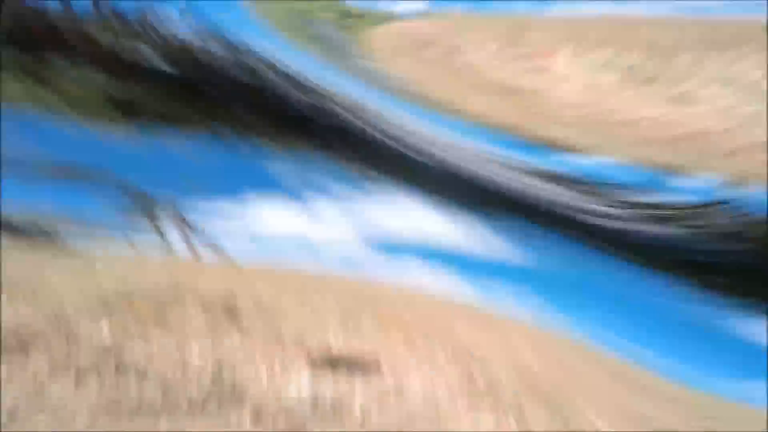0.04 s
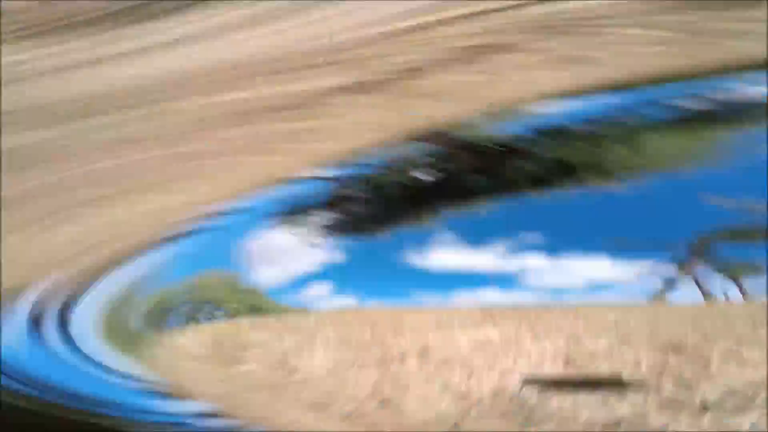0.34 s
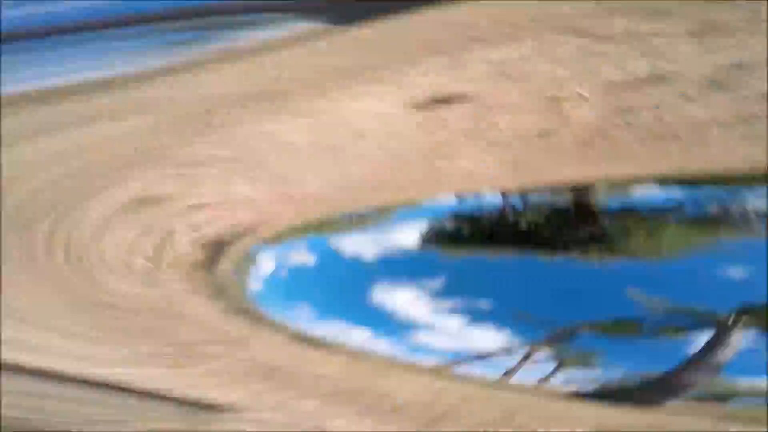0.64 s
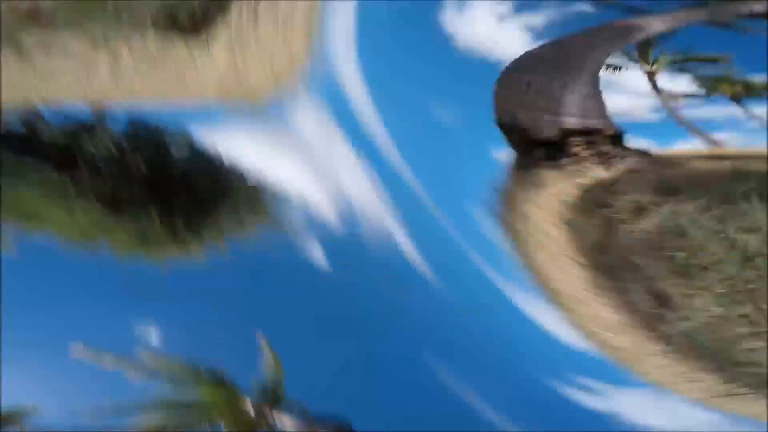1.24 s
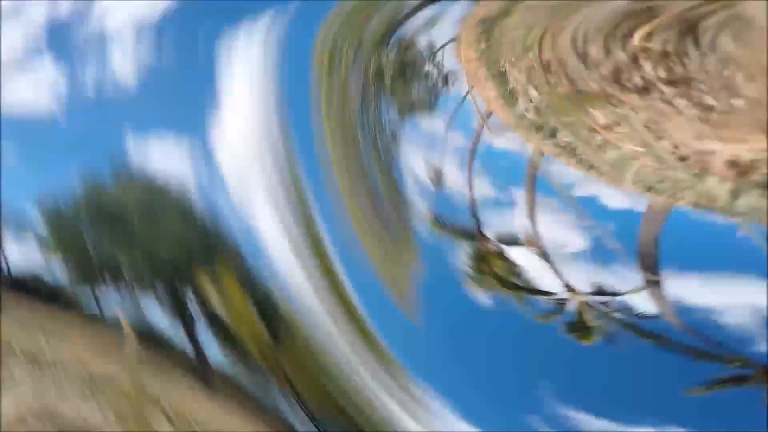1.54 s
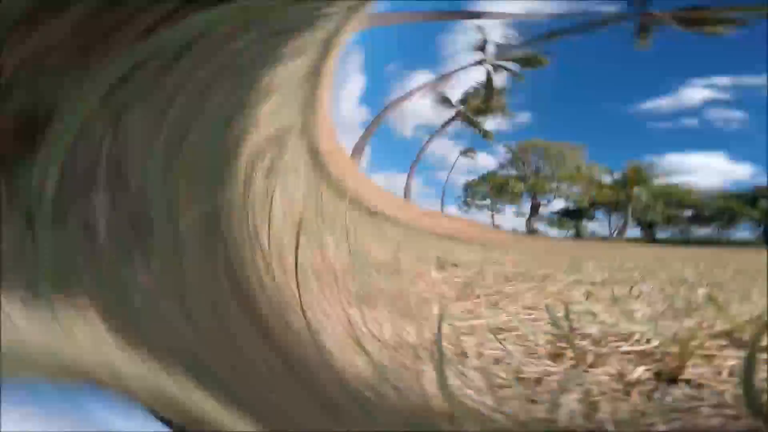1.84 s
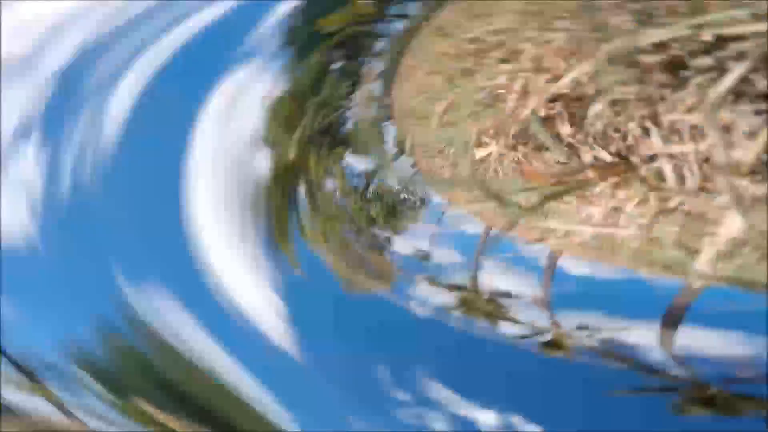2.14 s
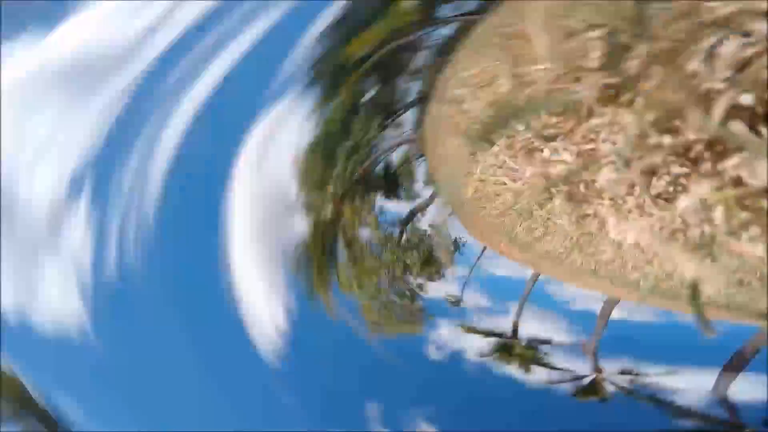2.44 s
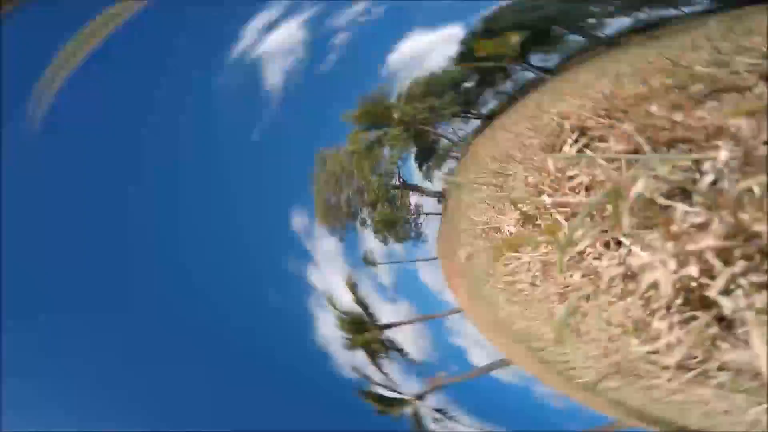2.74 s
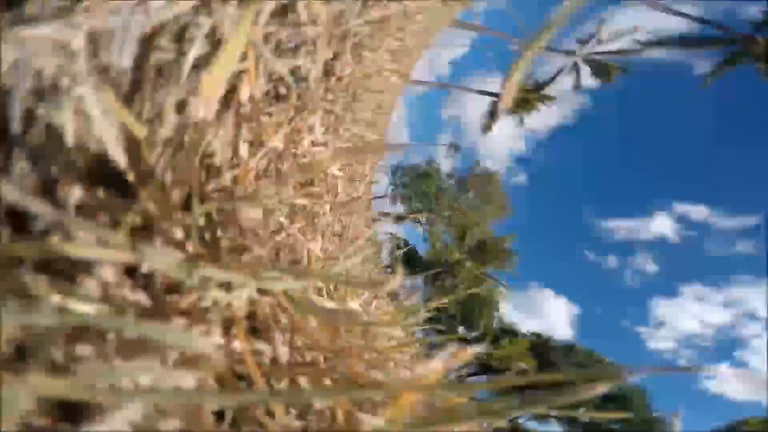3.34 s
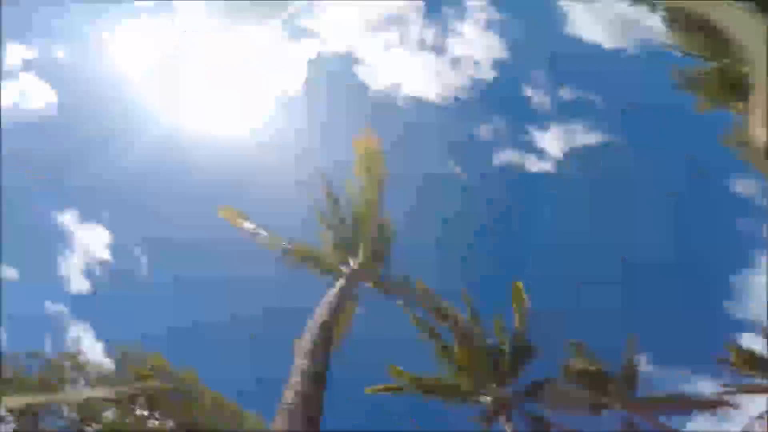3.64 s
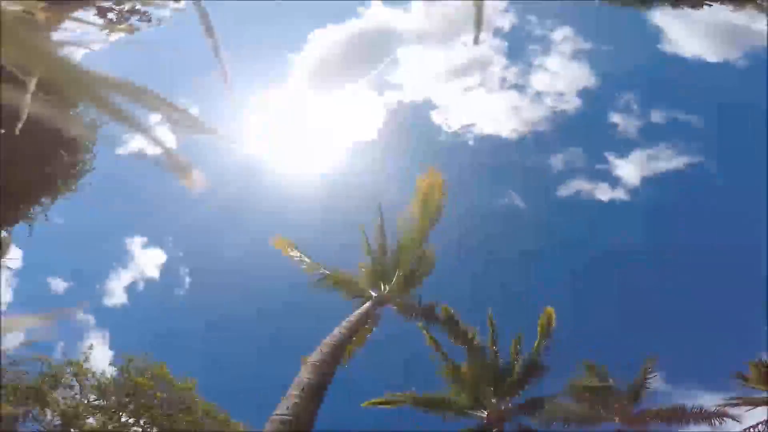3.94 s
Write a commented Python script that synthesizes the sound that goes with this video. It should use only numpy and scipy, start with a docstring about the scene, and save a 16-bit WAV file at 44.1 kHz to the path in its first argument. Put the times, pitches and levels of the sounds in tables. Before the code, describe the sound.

A small drone tumbles through dry grass, heard from its own microphone. Low wind buffets at first, then sharp crunches with snapping stems and dull thumps land at about 0.4 and 1 second. From 1.4 seconds the crunches come quickly while the wind dies down. After about 2.5 seconds they merge into a crackling, scraping slide that fades near 3.9 seconds, ending with a very faint, brief whine.

```python
"""Low, gusty wind buffets the microphone of a small drone that cartwheels over a dry lawn, motors stopped.
The turbulence dies down as the tumble slows. Each touch of the ground crushes a tuft of brittle stalks,
whose fractures crackle and excite the shell's resonances; thick stems snap and the frame thumps on the soil.
The touches merge into a last slide, and a faint whine follows. All is heard from the drone's own camera."""
import sys
import numpy as np
from scipy import signal
from scipy.fft import rfft, irfft, next_fast_len
from scipy.io import wavfile
from scipy.ndimage import uniform_filter1d

SR = 44100
rng = np.random.default_rng(int(sys.argv[2]) if len(sys.argv) > 2 else 0)


def int16_out(signal):
    """Quantize to a 16-bit WAV file."""
    q = np.round(np.clip(np.atleast_2d(signal).T, -1, 1) * 32767)
    wavfile.write(sys.argv[1], SR, q.astype(np.int16))


N = 176400

# Spectrum of dry straw: f/Hz, level/dB
STRAW_SPECTRUM = [(150, -9.5), (500, -12), (1000, -10), (2000, -14.5), (2900, 5.5), (4500, 0), (6300, 2.5),
                  (8500, -0.5), (11000, -2), (14500, -8), (16000, -35.5)]


def crushed_tufts():
    """Brittle fracture and friction radiate directly and through the shell; touches add in power."""
    # Touches: t/s, hold/s, rise/s, fall/s, level/dB, shell gain/dB, treble tilt/dB
    touches = [ (0.363, 0.02, .015, 0.032, -35, -6, 1), (0.391, 0.0021, 0.023, 0.037, -18.5, -1.5, 2.5),
               (0.979, 0.0063, 0.035, 0.048, -15.5, -10, 1.5), (1.383, 0.003, 0.011, 0.089, -16, -2.5, 1.5),
               (1.43, 0.018, 0.045, 0.032, -19, -6.5, -1), (1.636, 0.0025, 0.021, 0.023, -33.5, 14, 4),
               (1.65, 0.021, 0.021, 0.023, -27.5, -1.5, -2), (1.83, 0.045, 0.013, 0.053, -28, -2.5, 3),
               (1.916, 0.011, 0.027, 0.046, -39.5, -0.5, 3), (2.003, 0.015, 0.037, 0.064, -27, -1, 2),
               (2.05, 0.013, 0.035, 0.043, -33, 2, -3), (2.248, 0.032, 0.025, 0.027, -23, -5, -0.5),
               (2.304, 0.0087, 0.04, 0.052, -51, 6.5, 5), (2.461, 0.012, 0.0066, 0.079, -22, 0.5, 2),
               (2.539, 0.04, 0.0068, .07, -32.5, -5.5, 2), (2.67, 0.011, 0.022, 0.02, -20.5, -13.5, 2.5),
               (2.647, 0.15, .012, 0.2, -40, 0.5, 4), (2.767, 0.0057, 0.012, 0.044, -29, -28, -4),
               (2.897, 0.0041, 0.039, 0.094, -23, -3, 1.5), (3.011, 0.021, 0.0083, .08, -45, 4.5, 0),
               (3.093, 0.0091, 0.031, 0.1, -31, -7.5, -4.5), (3.192, 0.015, 0.017, 0.067, -44, -7, -3),
               (3.257, 0.06, 0.011, 0.097, -44, 5, -5), (3.303, 0.011, 0.028, 0.28, -36, -6, -2),
               (3.387, 0.0039, 0.042, 0.077, -25.5, -8, 0), (3.476, 0.067, 0.073, 0.038, -38, -0.5, 5.5),
               (3.515, 0.071, 0.035, 0.073, -35, 1, 1), (3.633, 0.065, 0.24, .06, -42, -14, 1),
               (3.766, 0.016, 0.18, 0.18, -29.5, -5.5, 0)]
    slope_db = 41.5  # change over one rise or fall time
    t, power = clock(), np.zeros((3, N))
    for start, hold, rise, fall, db, shell_db, tilt_db in touches:
        level = db - slope_db * (np.maximum(start - t, 0) / rise + np.maximum(t - start - hold, 0) / fall)
        active = level > -100
        power[:, active] += amp(level[active] + np.array([[-tilt_db], [tilt_db], [shell_db]])) ** 2
    fractures = crackle(per_s=2600, scatter_db=3.5)
    rubbing = 0.44 * rng.standard_normal(N)
    stalks = patchy(fractures + rubbing, depth_db=2.2, width_hz=200, span_s=0.008)
    straw = steadied(coloured(stalks, STRAW_SPECTRUM), span_s=0.0087)
    treble = filtered(straw, lambda hz: 1 - 1 / (1 + (hz / 5000) ** 4))
    shell = steadied(filtered(stalks, shell_response), span_s=0.036)
    return np.sum(np.sqrt(power) * [straw - treble, treble, shell], axis=0)


def crackle(per_s, scatter_db, candidates=16000, size=320):
    """Stalks break at random instants, each a damped oscillation of random pitch and strength."""
    median_hz, log_spread, decay_cycles = 4763, 0.577, 1.5
    draws, detune = rng.random((candidates, 4)), rng.standard_normal(candidates)
    breaks = draws[:, 0] < per_s * N / SR / candidates
    onset, weakness, phase = np.hsplit(draws[breaks, 1:], 3)
    hz = np.clip(median_hz * np.exp(log_spread * detune[breaks]), 500, 16000)[:, None]
    cycles = hz * np.arange(size) / SR
    strength = amp(-scatter_db * np.log(np.maximum(weakness, 0.02))) * np.sqrt(hz)
    envelope = strength * (1 - np.exp(-2 * cycles)) * np.exp(-cycles / decay_cycles)
    rings = envelope * np.sin(2 * np.pi * (cycles + phase))
    samples = (onset * N).astype(int) + np.arange(size)
    return unit(np.bincount(samples.ravel(), rings.ravel(), N + size)[:N])


def shell_response(f):
    """Modal superposition: the shell responds as a sum of damped resonators of alternating sign."""
    # Shell modes: f/Hz, bandwidth/Hz, level/dB
    modes = [(730, 980, -10), (1388, 260, 2.5), (1636, 310, -2), (2882, 554, 2.5)]
    return sum((-1) ** k * amp(db) * 1j * f * width / (centre ** 2 - f ** 2 + 1j * f * width)
               for k, (centre, width, db) in enumerate(modes))


def sharp_ticks(size=2048):
    """Impulsive excitation by wind, fracture or impact: a noise burst about one pitch, with a faint ring."""
    # Two faint wind ticks on the microphone, then stems snapping and straw striking the shell:
    # t/s, relative peak level/dB, f/Hz, T60/s
    ticks = [(.066, -31, 2600, 0.0063), (.2125, -49, 2180, 0.005), (0.3602, -16.5, 2600, 0.004),
             (.3660, -14.5, 5500, 0.0039), (0.388, -3.5, 5500, 0.0056), (0.3895, -11.5, 4500, .007),
             (.3940, 0.5, 2700, 0.0058), (0.4118, -25, 6700, 0.0087), (0.942, -6.5, 2900, 0.0066),
             (0.9664, -6.5, 5600, 0.0041), (0.977, -16.5, 3400, 0.0095), (0.9797, -2.5, 4260, 0.0061),
             (1.3862, -22, 6400, 0.0069), (1.42, -10, 2900, 0.0028), (1.423, -6.5, 5000, 0.0056),
             (1.5106, -29.5, 8000, 0.0037), (1.585, -29.5, 3150, 0.0042), (1.616, -21, 2800, .0055),
             (1.6325, -12, 2850, .008), (1.65, -2, 7000, 0.0051), (1.8270, -21.5, 6450, 0.0055),
             (1.9864, -14, 7700, 0.0046), (2.0173, -6, 6500, 0.0078), (2.0955, -19.5, 6600, 0.011),
             (2.199, -31.5, 6500, 0.027), (2.2458, -8, 4900, 0.0037), (2.2509, -2.5, 3200, 0.002),
             (2.2798, -9.5, 7300, 0.014), (2.3453, -33, 3100, 0.0089), (2.4365, -23.5, 4100, 0.017),
             (2.4615, -5.5, 3300, 0.026), (2.4744, -6.5, 2200, 0.014), (2.4827, -1, 7800, 0.0026),
             (2.5334, -14, 4900, .012), (2.6374, -16.5, 5200, 0.017), (2.6525, -13, 4360, .004),
             (2.6735, -8, 5200, 0.0045), (2.6744, 1.5, 5600, 0.0023), (2.696, -9, 6400, 0.0039),
             (2.755, -5.5, 3600, 0.0054), (2.798, -14.5, 5400, 0.017), (2.829, -17, 2750, 0.022),
             (2.573, -13.5, 6150, 0.0099), (2.594, -22, 4800, 0.0058), (2.8703, -6.5, 3200, 0.012),
             (2.8787, -11, 4500, 0.002), (2.8878, -1.5, 3400, 0.0013), (3.0724, -21, 3160, 0.016),
             (3.0877, -22.5, 4000, .004), (3.094, -17, 2900, 0.0064), (3.2244, -22.5, 6300, 0.0036),
             (3.377, -7, 3100, 0.0078), (3.4473, -18.5, 6400, 0.015), (3.520, -9, 2750, 0.016),
             (3.5435, -26, 4500, .004), (3.579, -20.5, 3020, 0.0044), (3.7021, -15.5, 3000, .004),
             (3.723, -10, 3400, 0.0041), (3.728, -10, 3600, 0.0022), (3.811, -16, 4420, 0.0035)]
    log_width, ring_db, ring_t60 = 0.29, -14, 0.022
    out, t = np.zeros(N + size), np.arange(size) / SR
    attack = 1 - np.exp(-t / 0.00005)
    for start, db, hz, t60 in ticks:
        band = lambda f: np.exp(-0.5 * (np.log((f + 1) / hz) / log_width) ** 2)
        skirt = lambda f: 0.33 * f / (f + 900) / (1 + (f / (2.5 * hz)) ** 3)
        grain = filtered(rng.standard_normal(size), lambda f: band(f) + skirt(f))
        decay = amp(-60 * t / t60) + amp(ring_db - 60 * t / ring_t60)
        burst = steadied(grain, span_s=0.0012) * decay * attack
        out[round(start * SR):][:size] += amp(db - 1.5) * burst / np.abs(burst).max()
    return out[:N]


def frame_thumps():
    """Inelastic impact: soft soil stops the frame with one low push and a dull puff."""
    # Impacts: t/s, level/dB, duration/s
    impacts = [(0.388, -13, 0.039), (0.983, -24.5, 0.043), (1.645, -28.5, 0.054), (2.039, -33.5, 0.051),
               (2.14, -32, 0.041), (2.26, -29.5, 0.087), (2.459, -28.5, 0.057), (2.618, -36.5, .12),
               (3.09, -69, 0.22), (3.307, -34, 0.057), (3.403, -41, 0.058), (3.586, -56, 0.11),
               (3.776, -39.5, 0.032)]
    # Spectrum of the puff of soil: f/Hz, level/dB
    soil_spectrum = [(20, -11), (60, 0), (120, 0), (220, -8.5), (400, -17.5), (800, -23.5), (2000, -43.5),
                     (8000, -86.5)]
    push_hz, puff_db = 56, -3.5
    t, push, puff = clock(), np.zeros(N), np.zeros(N)
    for start, db, duration in impacts:
        since = np.maximum(t - start, 0)
        age = 6 * since / duration  # the swell peaks at age 1
        swell = amp(db) * (age * np.exp(1 - age)) ** 2
        push += swell * np.sin(2 * np.pi * push_hz * since)
        puff += swell
    return push + amp(puff_db) * puff * steadied(noise(soil_spectrum), span_s=0.018)


def air_buffeting():
    """Turbulent pressure falls as the tumble slows; each swell of the rumble brings a rougher flutter."""
    # Strength of the air stream: t/s, relative level/dB
    stream = [(0.0, -20), (0.02, -20.5), (0.38, -21), (0.39, -23), (0.5, -30), (1.0, -21.5), (1.04, -35.5),
              (1.34, -28), (1.53, -37), (1.67, -35.5), (1.69, -36.5), (2.08, -36.5), (2.21, -42),
              (2.24, -34), (3.27, -55), (3.32, -40), (3.35, -53), (4.0, -64)]
    # Spectrum of the slow pressure swells: f/Hz, level/dB
    rumble_spectrum = [(12, -10.5), (28, 1), (55, 0), (80, -7.5), (120, -17), (200, -27.5), (400, -48),
                       (1000, -83)]
    # Spectrum of the flutter: f/Hz, level/dB
    flutter_spectrum = [(60, -19.5), (160, 2.5), (330, 1.5), (600, -10.5), (1200, -21), (2500, -33),
                        (5000, -46.5), (12000, -61)]
    # Eddies tearing at the microphone port: t/s, level/dB
    eddies = [(0.021, -34), (0.05, -35.5), (0.069, -39), (0.122, -37), (0.168, -37), (0.215, -29),
              (0.236, -31), (0.276, -38), (0.314, -35), (.603, -43), (0.782, -39.5), (0.836, -41),
              (0.877, -51), (1.106, -47.5), (1.283, -57.5)]
    gust_db, swing_db, flutter_growth, eddy_s = 2, 5, 1.102, 0.002
    t = clock()
    gusts = np.clip(noise([(5, -12.5), (12, 3), (25, -3), (60, -76), (200, -120)]), -2, 2)
    level = np.interp(t, *np.transpose(stream)) + gust_db * gusts
    rumble = steadied(noise(rumble_spectrum), span_s=0.015)
    flutter = patchy(noise(flutter_spectrum), depth_db=3, width_hz=230, span_s=0.0026)
    flutter = unit(flutter * amp(swing_db * np.clip(rumble, -2, 2)))
    flutter_db = level.mean() + flutter_growth * (level - level.mean()) - 19
    pulses = sum(amp(db) * np.exp(-0.5 * ((t - centre) / eddy_s) ** 2) for centre, db in eddies)
    tearing = noise([(150, -22), (500, 8), (1200, -4.5), (3000, -18), (6000, -39), (14000, -61)])
    return amp(level + 1) * rumble + amp(flutter_db) * flutter + pulses * tearing


def stray_blades():
    """Light friction: single blades of grass brush the shell with soft ticks between the touches."""
    # Strength of the brushing: t/s, level/dB
    brushing = [(1.44, -86.5), (1.48, -80), (1.54, -58), (1.7, -55.5), (1.73, -93), (1.81, -90),
                (1.9, -48.5), (2.13, -54.5), (2.18, -69), (2.22, -47.5), (2.32, -69), (2.37, -68.5),
                (2.45, -40), (3.85, -56), (3.95, -76.5)]
    cutoff_hz = 6000
    ticks = coloured(crackle(per_s=500, scatter_db=5), STRAW_SPECTRUM) + 0.15 * noise(STRAW_SPECTRUM)
    dulled = filtered(ticks, lambda hz: 1 / np.sqrt(1 + (hz / cutoff_hz) ** 2))
    return steadied(dulled, span_s=0.03) * amp(np.interp(clock(), *np.transpose(brushing)))


def whine():
    """Frequency modulation: a faint tone and its octave rise and fall once the drone lies still."""
    start_s, duration_s, level_db = 3.91, 0.086, -63
    base_hz, glide_hz, waver_hz = 364, 161, 10
    arch = np.sin(np.pi * np.clip((clock() - start_s) / duration_s, 0, 1))
    hz = base_hz + glide_hz * arch + waver_hz * noise([(100, 3.5), (400, -46.5)])
    phase = 2 * np.pi * np.cumsum(hz) / SR
    return amp(level_db) * arch * (np.sin(phase) + amp(-11.5) * np.sin(2 * phase))


def noise_floor():
    """Stationary noise, strongest in the bass, lies faintly under everything."""
    return amp(-71.5) * noise([(50, 4), (1000, -13), (4000, -23.5), (15000, -30)])


def amp(db):
    """Amplitude ratio of a level in decibels."""
    return 10 ** (np.asarray(db) / 20)


def unit(x):
    """Normalisation to rms 1."""
    return x / np.sqrt(np.mean(x ** 2) + 1e-20)


def clock():
    """Sampling instants, t/s."""
    return np.arange(N) / SR


def filtered(x, response):
    """Linear filtering: the spectrum of x times a frequency response."""
    size = next_fast_len(len(x) + 4096)
    return irfft(rfft(x, size) * response(np.fft.rfftfreq(size, 1 / SR)), size)[:len(x)]


def coloured(x, points):
    """Spectral shaping by points (f/Hz, level/dB), at rms 1."""
    f, db = np.transpose(points)
    return unit(filtered(x, lambda hz: amp(np.interp(np.log(hz + 1), np.log(f), db))))


def noise(points):
    """Gaussian noise of rms 1 with the spectrum (f/Hz, level/dB)."""
    return coloured(rng.standard_normal(N), points)


def steadied(x, span_s):
    """Division by the running rms evens out level changes slower than span_s."""
    size = max(int(span_s * SR), 8)
    return x / np.sqrt(np.abs(uniform_filter1d(uniform_filter1d(x * x, size), size)) + 1e-9)


def patchy(x, depth_db, width_hz, span_s):
    """Random modulation in time and frequency makes brief spectral peaks come and go."""
    spectra = signal.stft(x, nperseg=256)[2]
    bell = lambda width: np.exp(-0.5 * (np.arange(-12, 13) / width) ** 2)
    kernel = np.outer(bell(width_hz * 256 / SR), bell(span_s * SR / 128))
    field = unit(signal.fftconvolve(rng.standard_normal(spectra.shape), kernel, "same"))
    return signal.istft(spectra * amp(depth_db * np.clip(field, -2, 2)), nperseg=256)[1][:N]


def scene():
    """Free-field superposition: the sources add at the camera, with no echo."""
    contacts = crushed_tufts() + stray_blades()
    return (contacts + sharp_ticks() + frame_thumps() + air_buffeting() + whine() + noise_floor())[None]


def record(dry):
    """Saturation in the camera rounds the highest peaks; a steep low-pass limits the bandwidth."""
    ceiling, cutoff_hz = 0.56, 15700
    rounded = dry[0] / (1 + np.abs(dry[0] / ceiling) ** 6) ** (1 / 6)
    return filtered(rounded, lambda hz: 1 / (1 + (hz / cutoff_hz) ** 120))[None]


dry = scene()
out = record(dry)
int16_out(out)
```